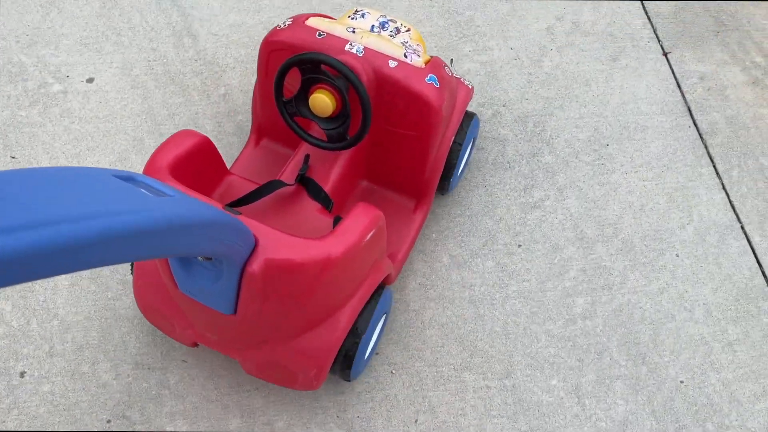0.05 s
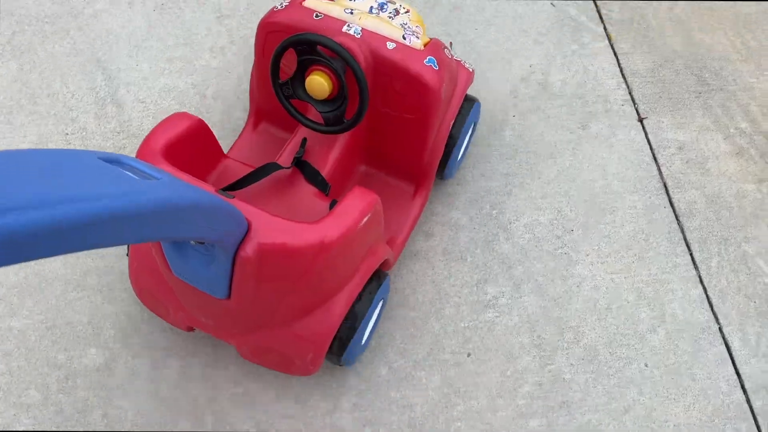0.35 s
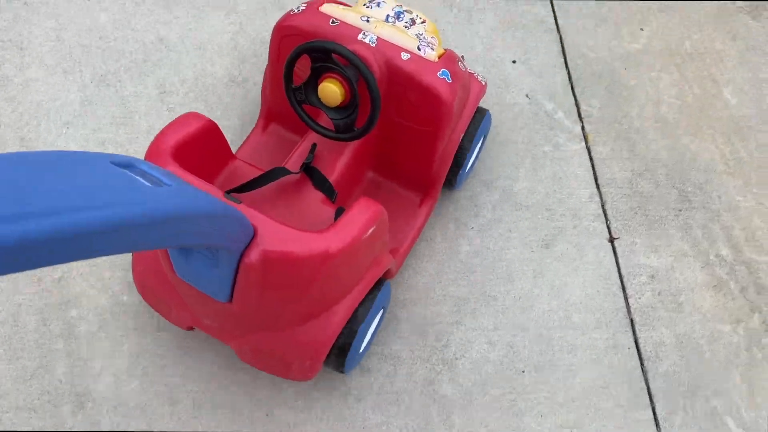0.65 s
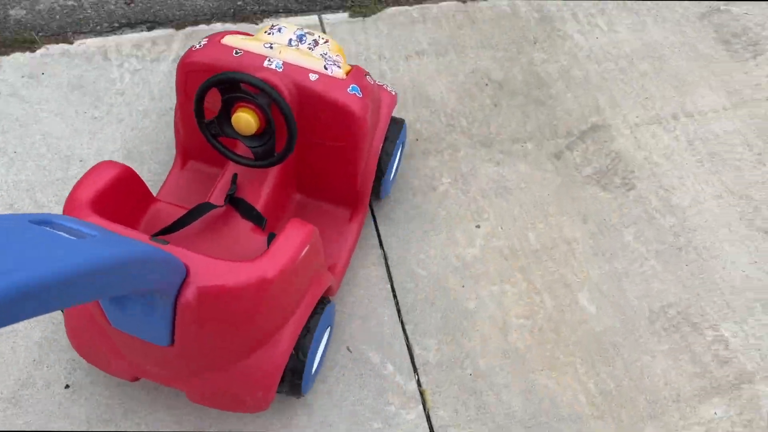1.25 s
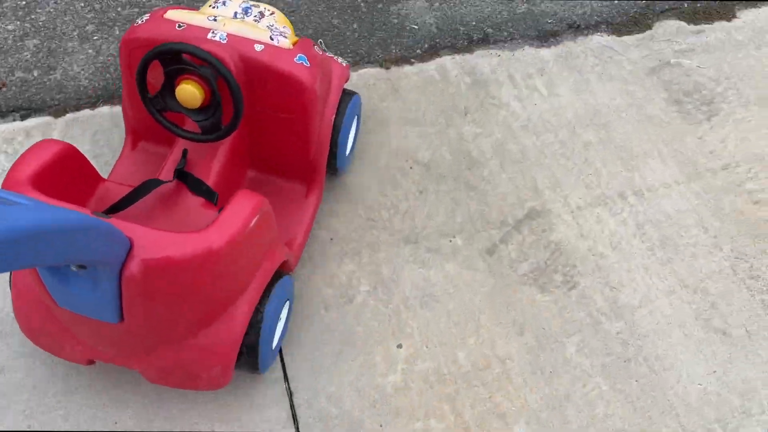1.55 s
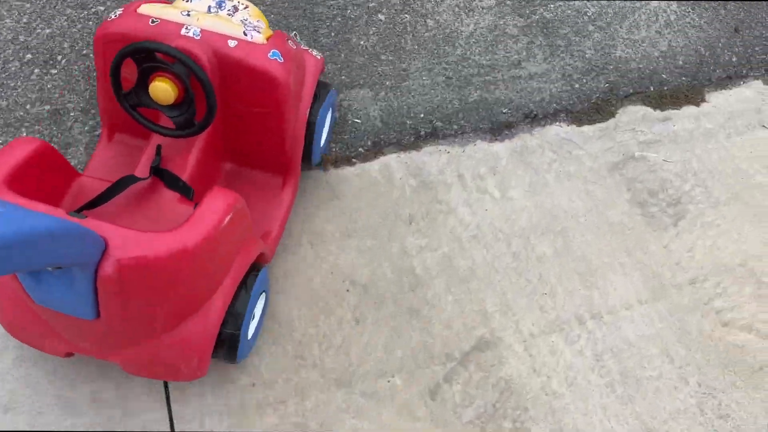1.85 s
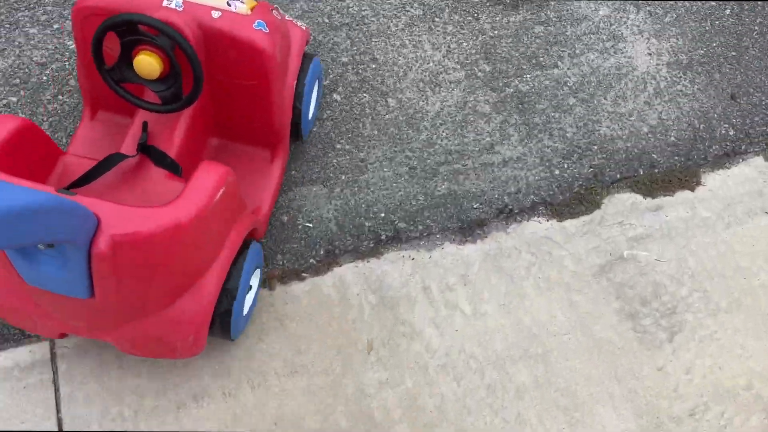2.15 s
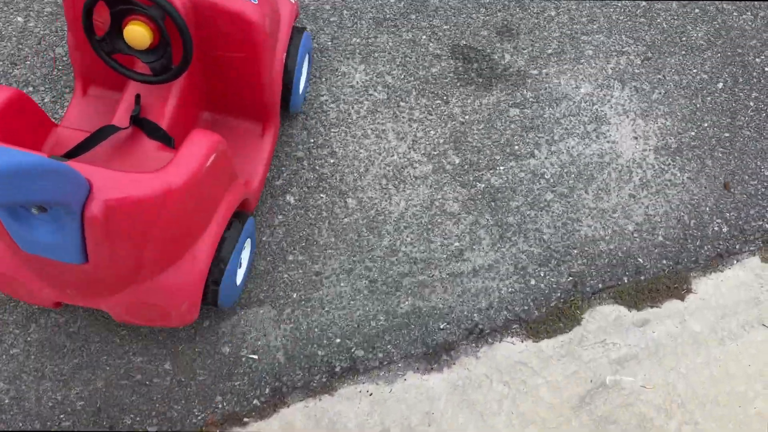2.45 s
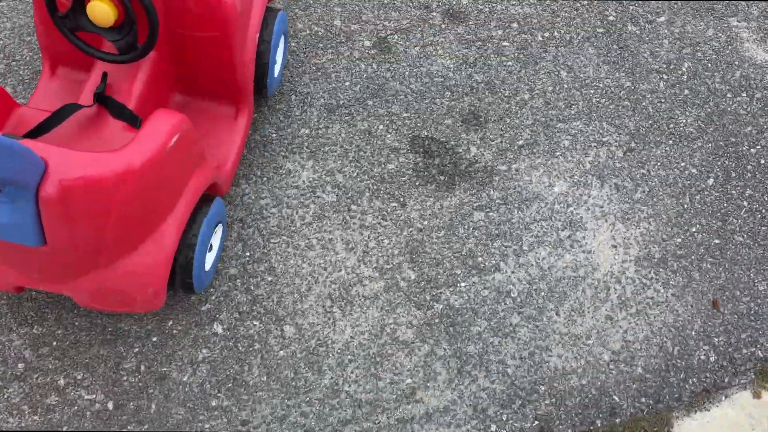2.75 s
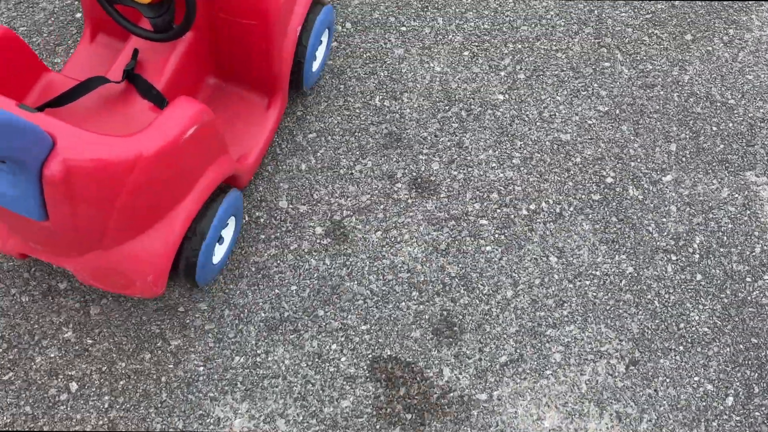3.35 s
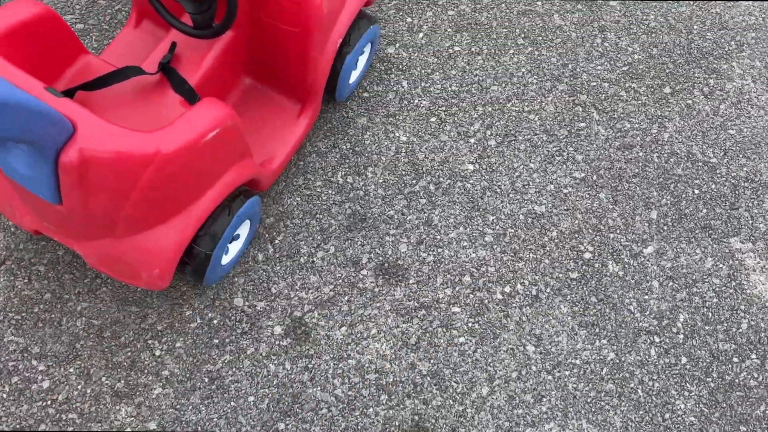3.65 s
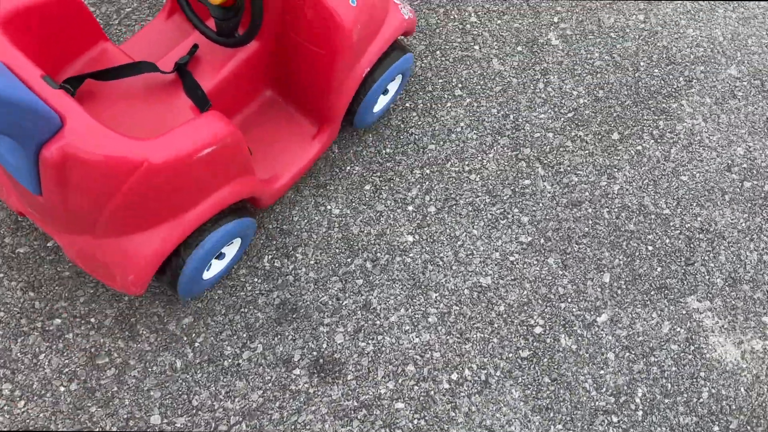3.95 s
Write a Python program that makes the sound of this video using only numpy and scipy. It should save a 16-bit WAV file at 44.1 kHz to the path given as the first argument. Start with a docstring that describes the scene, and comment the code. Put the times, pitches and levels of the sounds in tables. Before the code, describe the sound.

A plastic ride-on car rolls over pavement, with low rumbling, knocks and rattling wheels.

```python
"""A hollow plastic ride-on car rumbles and knocks as it is pushed over concrete, a joint and rough asphalt.
Bumps in the ground send bending waves through the shell, which arrive as short falling chirps over
a low boom. The loose wheels clack on their axles and skid twice; grit ticks under them and rings
the steel. A phone close above rounds the peaks."""
import sys
import numpy as np
from scipy import signal
from scipy.fft import rfft, irfft
from scipy.io import wavfile
from scipy.ndimage import uniform_filter1d

SR = 44100
rng = np.random.default_rng(int(sys.argv[2]) if len(sys.argv) > 2 else 0)


def master(y):
    """Save y as 16-bit WAV."""
    cut = np.clip(np.atleast_2d(y).T, -1, 1)
    pcm = np.round(cut * 32767)  # scale
    wavfile.write(sys.argv[1], SR, pcm.astype(np.int16))


N = 176400
BUMPS_PER_S, RATTLES_PER_S, IMPACT_SPREAD_DB = 380, 100, 1.5
CLACK_DECAY_S, TICK_DECAY_S = .0038, .0027
SIDE_DB = -16  # bumps of the far wheels reach the two microphones differently
LEFT_RIGHT = np.array([[1], [-1]])


def undb(db):
    """Decibels to gain."""
    return 10 ** (np.asarray(db) / 20)


def unit(x):
    """Scale to rms 1."""
    return x / np.sqrt(np.mean(x ** 2))


def over_hz(points, hz):
    """Read (Hz, value) points on a log-frequency axis."""
    freqs, values = np.array(points, float).T
    return np.interp(np.log(hz + 1), np.log(freqs), values)


def fader(rows, column=1):
    """Gain over time from one dB column of a table."""
    points = np.array(rows)
    return undb(np.interp(np.arange(N) / SR, points[:, 0], points[:, column]))


def through(x, response):
    """Filter with a complex response given as a function of frequency."""
    hz = np.arange(N + 1) * SR / (2 * N)
    return irfft(rfft(x, 2 * N) * response(hz))[..., :N]


def colour(x, points):
    """Minimum-phase EQ through (Hz, dB) points; white noise keeps its power."""
    def response(hz):
        cepstrum = irfft(np.log(unit(undb(over_hz(points, hz)))))
        cepstrum[1:N] *= 2
        cepstrum[N + 1:] = 0
        return np.exp(rfft(cepstrum))
    return through(x, response)


def band(x, hz, width):
    """A resonance with steep skirts; white noise keeps about its power."""
    b, a = signal.iirpeak(hz, hz / (2 * width), fs=SR)
    return signal.lfilter(b, a, signal.lfilter(b, a, x)) * np.sqrt(SR / (np.pi * width))


def crossover(dull, bright, hz=9500):
    """The lows of one sound joined to the highs of another."""
    return sum(signal.sosfilt(signal.butter(4, hz, side, fs=SR, output="sos"), x)
               for side, x in (("low", dull), ("high", bright)))


def steady(x, span_s=0.096):
    """Hold the running rms near 1 and leave the quick detail."""
    power = np.abs(uniform_filter1d(x ** 2, int(span_s * SR)))
    return x / np.sqrt(power + 1e-3 * np.mean(x ** 2))


def impacts(per_s, spread_db=IMPACT_SPREAD_DB):
    """Random impulses, most near gain 1 and a few up to four spreads away."""
    lands = rng.random(N) < per_s / SR
    size = np.minimum(rng.exponential(size=N), 4)
    return lands * undb(spread_db * size)


def strikes(times, dbs):
    """Impulses at given times and levels."""
    return np.bincount((times * SR).astype(int), undb(dbs), N)[:N]


def burst(hits, decay_s, rise_s=0):
    """Envelope that jumps at every impulse and dies away."""
    power = signal.lfilter([1], [1, -np.exp(-2 / (decay_s * SR))], hits ** 2 + 1e-18)
    return np.sqrt(np.abs(uniform_filter1d(power, 1 + int(rise_s * SR))))


def cracks(hits, decay_s):
    """Every impulse becomes a short burst of noise."""
    return burst(hits, decay_s) * rng.standard_normal(N)


def chirps(rows, rise_s, fall_s, glide_s):
    """A few cycles that swell and sink in pitch: the high part of a bending wave arrives first."""
    out = np.zeros(N)
    reach = SR // 25
    for crest, db, hz in rows:
        centre = int(crest * SR)
        i = np.arange(max(centre - reach, 0), min(centre + reach, N))
        t = i / SR - crest
        swell = np.exp(-.5 * np.abs(t / np.where(t < 0, rise_s, fall_s)) ** 3)
        cycles = hz * glide_s * (1 - np.exp(-t / glide_s))
        out[i] += undb(db) * swell * np.cos(2 * np.pi * cycles)
    return out


def hollow(x, t60_s, ring_db):
    """Add the diffuse ring of the hollow body, different at each microphone."""
    t = np.arange(SR // 2) / SR
    attack = 1 - np.exp(-t / 0.00076)
    tail = rng.standard_normal((2, len(t))) * undb(-60 * t / t60_s) * attack
    tail /= np.sqrt(np.sum(tail ** 2, axis=1, keepdims=True))
    return x + undb(ring_db) * signal.fftconvolve(np.atleast_2d(x), tail, axes=1)[:, :N]


# partials of the steel axles (frequency [Hz], relative level [dB], t60 [s])
AXLE_MODES = [(5680, 4.5, 0.04), (7480, 5, 0.03), (11150, 5, 0.012), (12840, -1, 0.06), (13290, 7, 0.018)]

def axle(x):
    """The steel axles answer with a thin, high ring."""
    t = np.arange(SR // 4) / SR
    ring = sum(undb(db - 60 * t / t60) / np.sqrt(t60) * np.sin(2 * np.pi * hz * t)
               for hz, db, t60 in AXLE_MODES)
    return signal.fftconvolve(x, ring / np.sqrt(np.sum(ring ** 2)))[:N]


# faders of the ride, shared with wheels and shell (time [s], rumble [dB], rattle [dB], grit [dB])
RIDE_FADERS = [(0.0, -32, -45.5, -45.5), (0.19, -22.5, -38.5, -56.5), (0.37, -24.5, -39, -47.5),
               (0.44, -27, -44, -53.5), (0.7, -25, -40, -48.5), (0.75, -17.5, -32.5, -50),
               (0.81, -31.5, -47, -52), (0.85, -22.5, -41.5, -52), (1.31, -25, -44.5, -53.5),
               (1.39, -13, -26, -38), (1.44, -20, -41, -46.5), (1.57, -26.5, -40, -51.5),
               (1.6, -21, -34, -45.5), (1.71, -19, -34, -46.5), (1.82, -25, -51, -49),
               (1.89, -21, -39.5, -49), (2.3, -16, -35, -42.5), (2.46, -23, -44.5, -55),
               (2.52, -20, -41, -47.5), (2.73, -20.5, -37.5, -46.5), (2.93, -25.5, -55.5, -54.5),
               (2.98, -27, -39, -43.5), (3.14, -22, -40.5, -54.5), (3.21, -26.5, -50, -70),
               (3.35, -26.5, -47.5, -56), (3.4, -19, -36.5, -50.5), (3.51, -27.5, -46.5, -60),
               (3.68, -23, -41.5, -51), (3.85, -27, -40, -56), (3.91, -20, -45, -51), (4.0, -25, -35, -53)]
# single grains snap under a wheel (time [s], relative level [dB], extra brightness [dB])
GRAIN_SNAPS = [(0.026, -38.5, -17), (0.0894, -32.5, -5), (0.101, -37, -13), (0.195, -31.5, -15),
               (0.276, -36, -7), (0.428, -35, -14), (0.6713, -29, -8), (0.8494, -24, -4.5),
               (0.9618, -32, -12), (1.104, -36.5, -13), (1.588, -33, -11), (1.709, -28, -14),
               (2.41, -39, 13), (3.148, -33, -18), (3.372, -33, -30), (3.7108, -34.5, -9)]
# crisp EQ of the grit (frequency [Hz], relative gain [dB])
GRIT_EQ = [(1500, 4.5), (4400, -3), (5700, 8), (7600, 3.5), (10000, -8), (11100, 3), (12400, 0),
           (15700, 10.5), (16400, -19)]

def grit():
    """Sand crackles under the wheels, brighter under pressure, and rings the axles; single grains snap."""
    grains = impacts(per_s=270, spread_db=3.5)
    pressure = undb(2) * fader(RIDE_FADERS, column=3)
    crunch = steady(cracks(grains, TICK_DECAY_S), span_s=0.15)
    hiss = 0.17 * rng.standard_normal(N)
    sand = pressure * (crunch + hiss)
    sizzle = sand * unit(pressure) ** .4
    ring = axle(pressure * steady(cracks(grains, TICK_DECAY_S)))
    times, snap_db, bright_db = np.array(GRAIN_SNAPS).T
    tilt_db = bright_db + 5
    low_db = snap_db + 7.5 - 10 * np.log10((1 + undb(tilt_db) ** 2) / 2)  # trade lows for highs
    snap_lows = cracks(strikes(times, low_db), TICK_DECAY_S)
    snap_highs = cracks(strikes(times, low_db + tilt_db), TICK_DECAY_S)
    crackle = crossover(sand + snap_lows, sizzle + snap_highs)
    return colour(crackle, GRIT_EQ) + undb(-4) * ring


# a wheel skids in the joint, then on the asphalt (start [s], length [s], level [dB])
SKID_CUES = [(1.39, 0.041, -43), (3.884, 0.048, -22.5)]
# raspy EQ of a skid (frequency [Hz], relative gain [dB])
SKID_EQ = [(800, -4.5), (1700, -5.5), (3300, -3.5), (4300, -18), (5800, -12), (9000, -36)]

def skids():
    """The plastic tread sticks and slips on the stones in a quick rasp."""
    t = np.arange(N) / SR
    gate = sum(undb(db) * np.exp(-np.abs(2 * (t - start) / length - 1) ** 6)
               for start, length, db in SKID_CUES)
    slips = steady(cracks(impacts(per_s=1300, spread_db=-2.5), decay_s=0.0017), span_s=0.02)
    return gate * colour(slips, SKID_EQ)


# a wheel clacks against its axle (time [s], relative level [dB])
WHEEL_CLACKS = [(0.1215, -27.5), (0.2113, -29), (0.3133, -27), (0.577, -38), (0.729, -27), (0.751, -21),
                (0.9614, -21), (1.3931, -26), (1.5869, -24.5), (1.611, -22.5), (1.8332, -27.5),
                (1.8614, -21.5), (1.949, -21), (1.9861, -19), (2.0449, -18.5), (2.0517, -17.5),
                (2.0973, -27), (2.2626, -22), (2.308, -31), (2.405, -23), (2.454, -22.5), (2.517, -24.5),
                (2.565, -26.5), (2.6074, -24), (2.642, -27.5), (2.6852, -21), (2.972, -26), (3.1425, -26),
                (3.279, -28), (3.37, -26.5), (3.4564, -25), (3.6532, -22), (3.6602, -22.5), (3.975, -27)]
# resonances of the hollow wheels (frequency [Hz], width [Hz], gain [dB])
WHEEL_RESONANCES = [(1000, 600, -9), (1733, 420, 1.5), (2450, 670, -5.5), (3480, 315, -5.5),
                    (5580, 1240, -10)]

def wheels(rise_s=0.00051):
    """Loose wheels rub, chatter, clack and skid; soft plastic gives each blow a moment to rise."""
    hits = impacts(RATTLES_PER_S)
    clacks = undb(-1.5) * strikes(*np.array(WHEEL_CLACKS).T)
    effort = undb(-4) * fader(RIDE_FADERS, column=2)
    rattle = 0
    for hz, width, db in WHEEL_RESONANCES:
        share = undb(2.5 * rng.standard_normal(N))  # each blow favours other resonances
        chatter = effort * steady(burst(hits * share, CLACK_DECAY_S, rise_s), span_s=0.116)
        blows = burst(clacks * np.sqrt(share), CLACK_DECAY_S, rise_s)
        ring = steady(band(rng.standard_normal(N), hz, width), span_s=CLACK_DECAY_S)
        rub = 0.4 * effort * band(rng.standard_normal(N), hz, width)
        rattle += undb(db) * (np.hypot(chatter, blows) * ring + rub)
    return hollow(rattle + skids(), t60_s=0.05, ring_db=-7)


# fader of the body's boom (time [s], relative level [dB])
BOOM_FADER = [(0.0, -38), (0.19, -17.5), (0.36, -19.5), (1.05, -33.5), (1.69, -23), (1.78, -33),
              (2.27, -27.5), (2.38, -22), (2.78, -22.5), (4.0, -29.5)]
# bass-heavy EQ of the boom (frequency [Hz], relative gain [dB])
BOOM_EQ = [(20, -52), (48, -4), (92, 5), (135, 0), (190, -23), (400, -56)]
# heavy jolts of the whole body (crest time [s], level [dB], pitch at crest [Hz])
BODY_JOLTS = [(.235, -37, 80), (.274, -17.5, 172), (.385, -5, 107), (1.352, -17, 135), (2.369, -10.5, 128)]

def body():
    """The whole car booms on its hard wheels and jolts at the bigger steps."""
    pushes = (impacts(BUMPS_PER_S) * rng.standard_normal(N) for _ in range(2))
    mid, side = (steady(colour(push, BOOM_EQ), span_s=0.14) for push in pushes)
    boom = mid + undb(SIDE_DB) / 2 * side * LEFT_RIGHT
    jolts = chirps(BODY_JOLTS, rise_s=0.0065, fall_s=0.01, glide_s=0.059)
    return undb(-1) * fader(BOOM_FADER) * boom + jolts


# squeak of a hub (crest time [s], level [dB], pitch at crest [Hz])
HUB_SQUEAKS = [(.2142, -19.5, 2000)]

def squeak():
    """A wheel hub gives one tiny falling squeak."""
    return chirps(HUB_SQUEAKS, rise_s=0.0014, fall_s=0.002, glide_s=0.034)


# resonances of the body panels (frequency [Hz], width [Hz], gain [dB])
PANEL_RESONANCES = [(489, 94, -10), (667, 143, -14), (825, 65, -19.5), (1037, 37, -23)]

def clatter():
    """The panels ring under random bumps, and much more so when the ride is hard."""
    hits = steady(cracks(impacts(RATTLES_PER_S), CLACK_DECAY_S))
    ride = fader(RIDE_FADERS, column=1)
    force = ride * unit(ride) ** .45
    return sum(undb(db) * band(force * hits, hz, width) for hz, width, db in PANEL_RESONANCES)


# boxy EQ of the plastic shell (frequency [Hz], relative gain [dB])
SHELL_EQ = [(70, -28), (130, -4), (235, 1), (330, -3), (460, -5.5), (580, -10), (1300, -30.5),
            (6000, -61.5)]

def rumble(travel_s=.011, at_hz=400):
    """Dense small bumps, spread into falling chirps as they travel through the plastic."""
    pushes = impacts(BUMPS_PER_S) * np.sign(rng.standard_normal(N))
    bent = through(pushes, lambda hz: np.exp(-4j * np.pi * travel_s * np.sqrt(at_hz * hz)))
    return steady(colour(bent, SHELL_EQ), span_s=0.13)


# hard bumps knock the shell (crest time [s], relative level [dB], pitch at crest [Hz])
SHELL_KNOCKS = [(0.042, -13, 368), (0.095, -17.5, 420), (0.128, -15.5, 467), (0.193, -14, 313),
                (0.467, -14.5, 424), (0.486, -19.5, 477), (0.5866, -9.5, 363), (0.6306, -15.5, 340),
                (0.737, -18.5, 530), (0.973, -5.5, 422), (1.3527, -9.5, 270), (1.3964, -18, 410),
                (1.415, -9.5, 343), (1.594, -14, 532), (1.6181, -9, 440), (1.9989, -9.5, 272),
                (2.0609, -7, 400), (2.182, -13, 326), (2.2392, -10.5, 315), (2.257, -13, 360),
                (2.3187, -11, 295), (2.3778, -7.5, 327), (2.414, -14, 346), (2.5213, -11.5, 426),
                (2.786, -14, 370), (2.965, -15, 436), (3.045, -18.5, 320), (3.151, -15, 327),
                (3.34, -18.5, 462), (3.4063, -16.5, 427), (3.4669, -16.5, 395), (3.7222, -11.5, 406),
                (3.803, -17, 388)]

def knocks(rise_s=0.0056, fall_s=0.0042, glide_s=0.019, lead_s=0.0042):
    """Each knock is a bending wave; a faster, higher one runs ahead, stronger after a hard blow."""
    main_waves = chirps(SHELL_KNOCKS, rise_s, fall_s, glide_s)
    overtones = [(crest - lead_s, 1.7 * db - 9, 2.15 * hz) for crest, db, hz in SHELL_KNOCKS]
    fast_waves = chirps(overtones, rise_s / 2, fall_s / 2, glide_s / 2)
    return undb(1.5) * (main_waves + fast_waves)


def shell():
    """Rumble, clatter, knocks and the hub's squeak all ring in the hollow shell."""
    stereo_rumble = rumble() + undb(SIDE_DB) * rumble() * LEFT_RIGHT
    rolling = undb(1.5) * fader(RIDE_FADERS, column=1) * stereo_rumble
    return hollow(rolling + clatter() + knocks() + squeak(), t60_s=0.059, ring_db=-9)


# stereo tilt of the microphone pair (frequency [Hz], left minus right [dB])
MIC_BALANCE = [(60, .3), (300, 3.3), (700, 1), (1290, -2), (2380, -1.5), (4400, 0)]
# phase between the microphones (frequency [Hz], lead of the left [rad])
MIC_PHASE = [(100, 0), (700, -.55), (1500, -.6), (2700, .6), (4400, 0)]

def scene():
    """The car as it reaches the two microphones."""
    def microphones(hz):
        gain = undb(LEFT_RIGHT / 2 * over_hz(MIC_BALANCE, hz))
        phase = LEFT_RIGHT / 2 * over_hz(MIC_PHASE, hz)
        return gain * np.exp(1j * phase)
    return through(body() + shell() + wheels() + grit(), microphones)


def record(dry, top_hz=15850):
    """The phone rounds the loudest peaks and cuts the top."""
    rounded = dry / (1 + dry ** 6) ** (1 / 6)
    return signal.sosfilt(signal.ellip(10, .2, 80, top_hz, fs=SR, output="sos"), rounded)


dry = scene()
out = record(dry)
master(out)
```